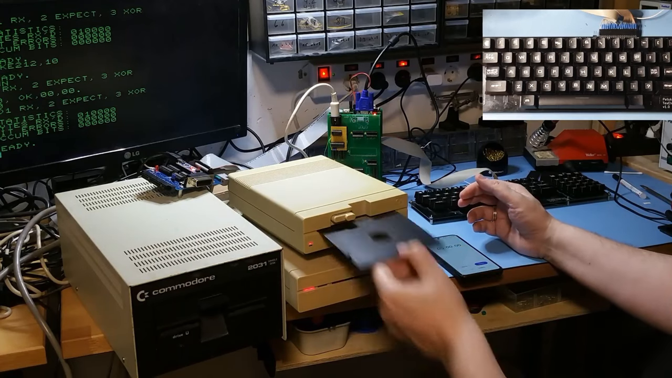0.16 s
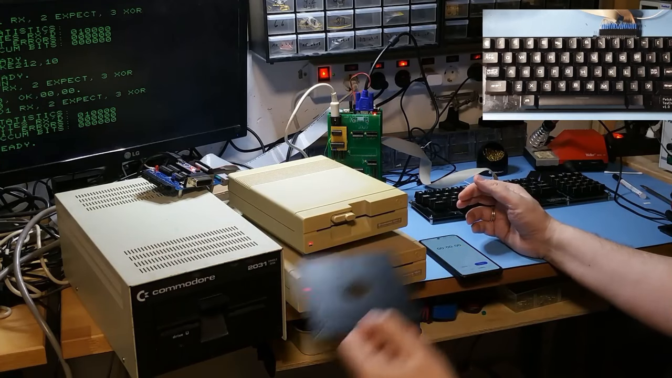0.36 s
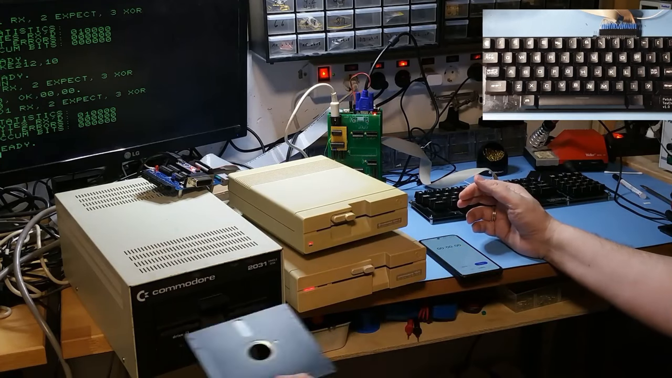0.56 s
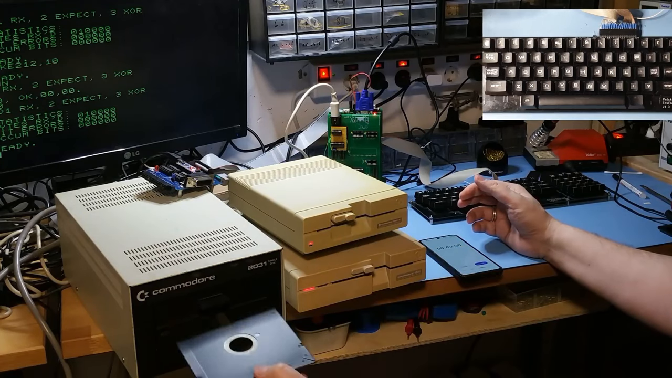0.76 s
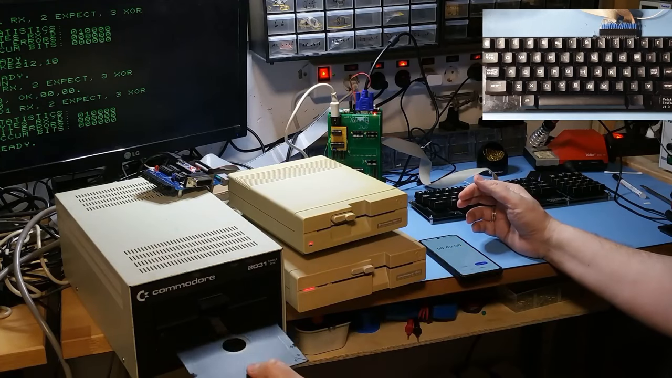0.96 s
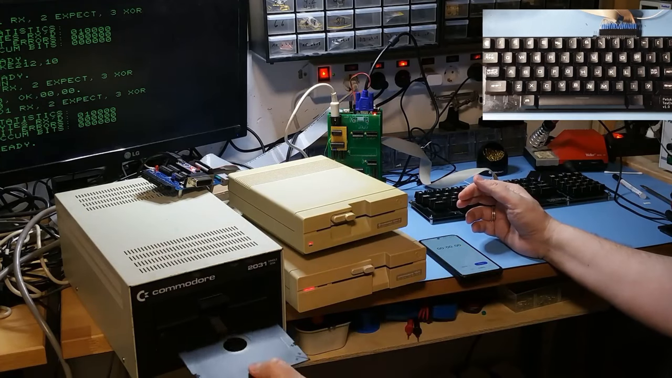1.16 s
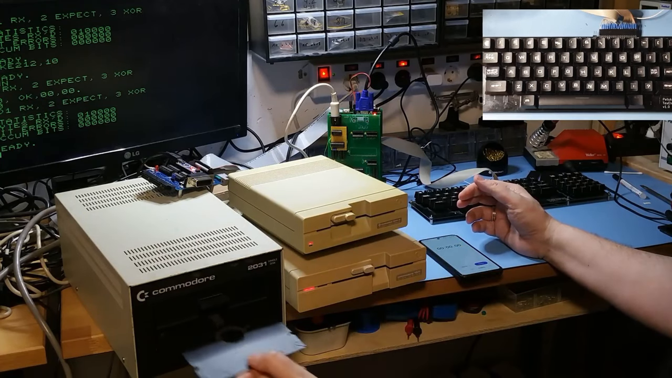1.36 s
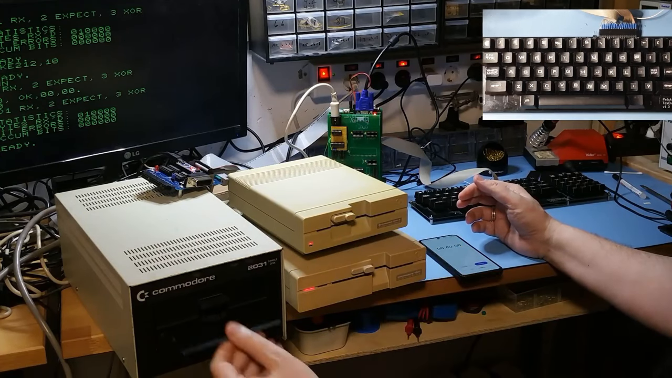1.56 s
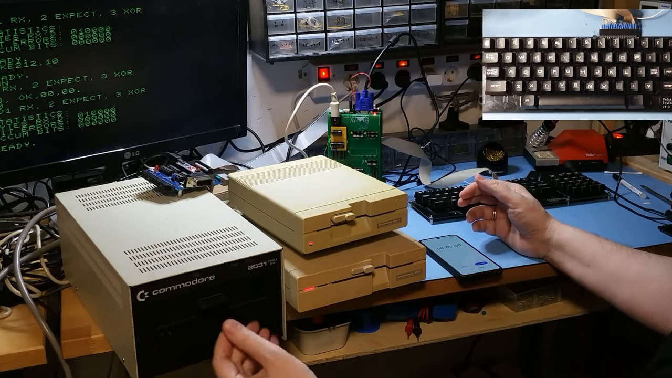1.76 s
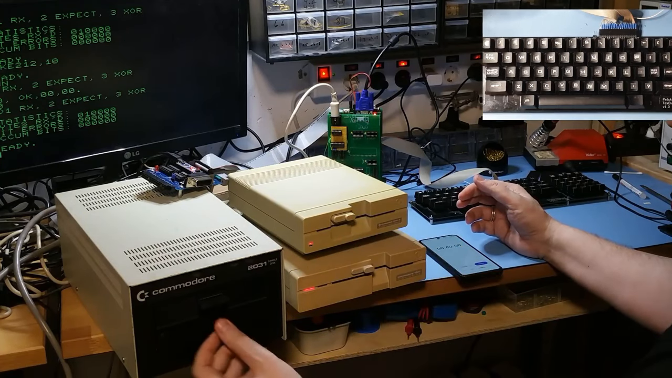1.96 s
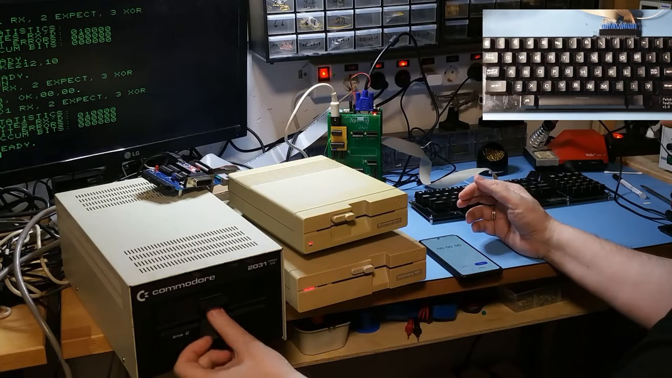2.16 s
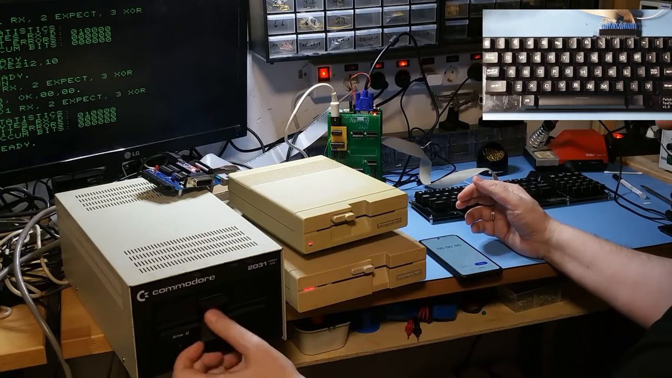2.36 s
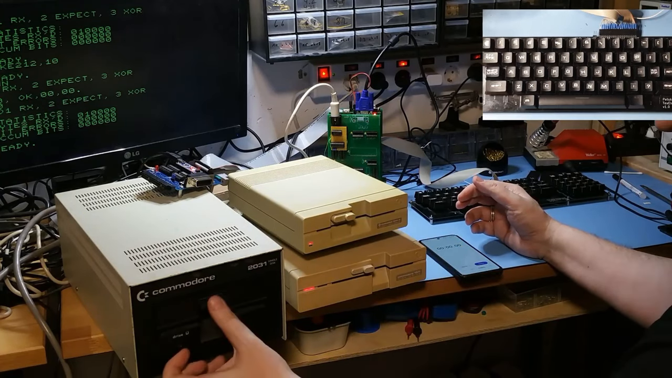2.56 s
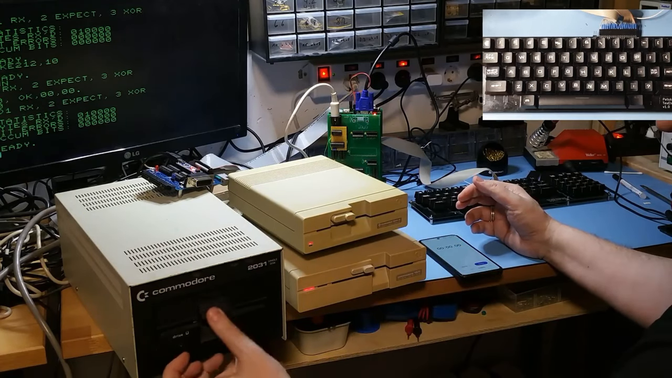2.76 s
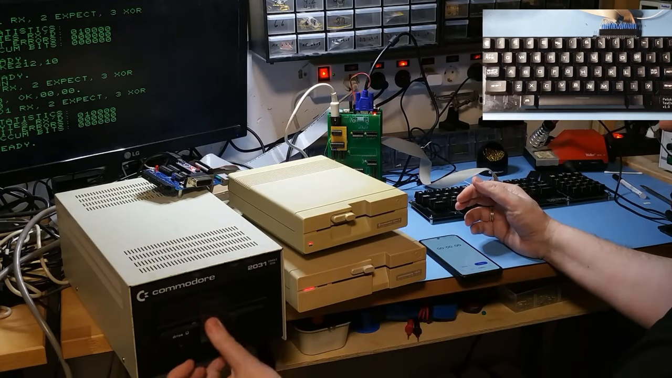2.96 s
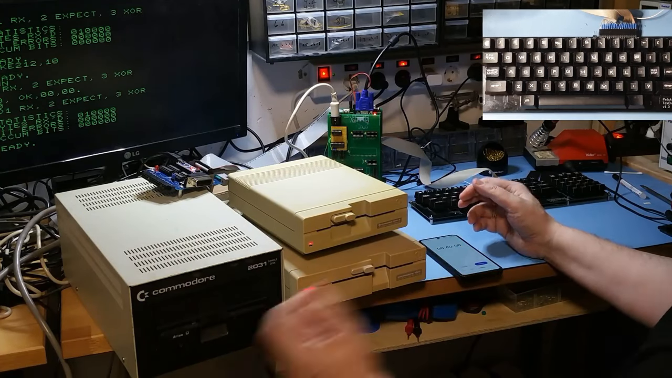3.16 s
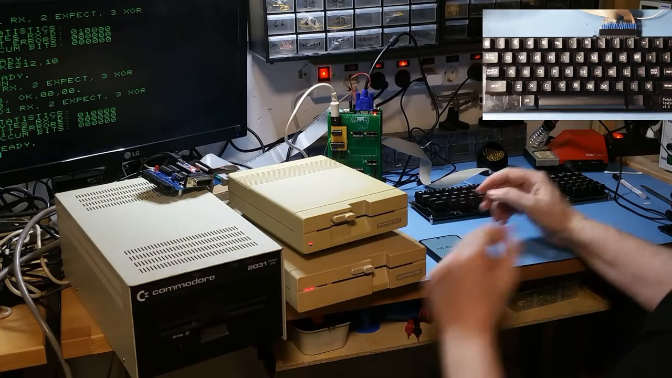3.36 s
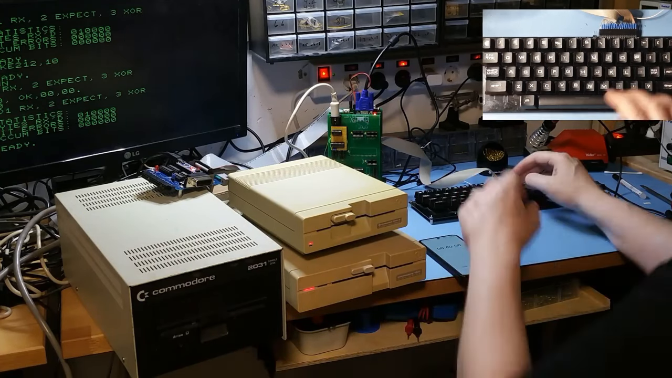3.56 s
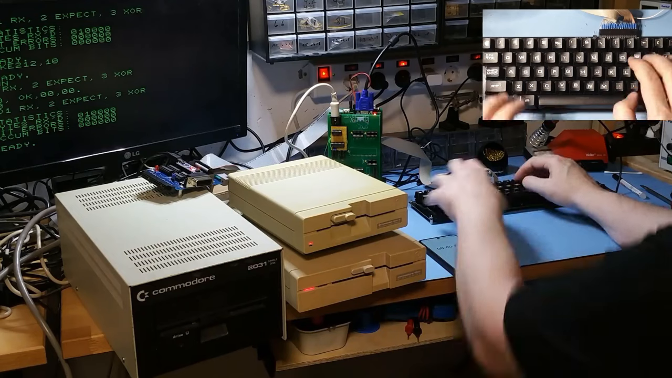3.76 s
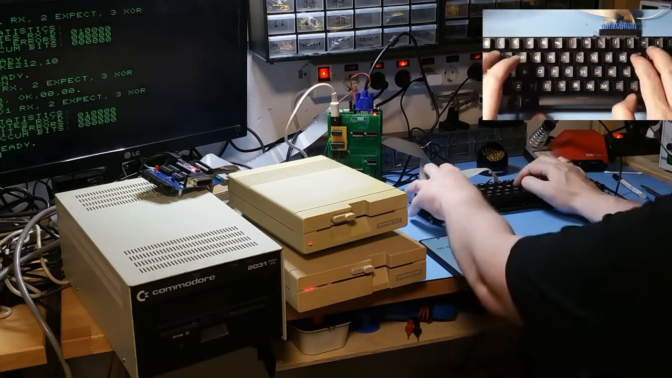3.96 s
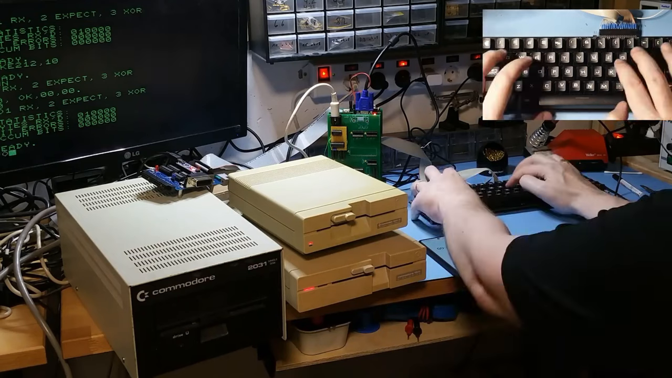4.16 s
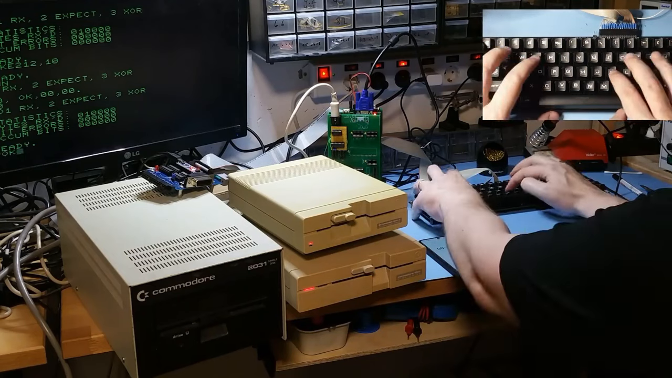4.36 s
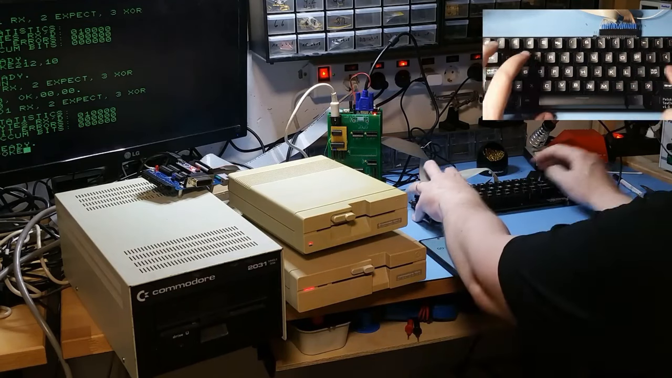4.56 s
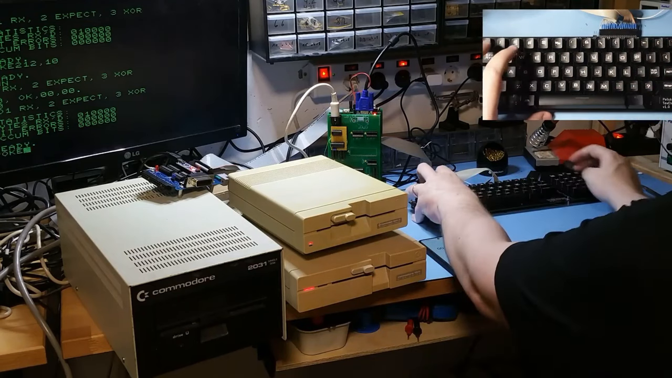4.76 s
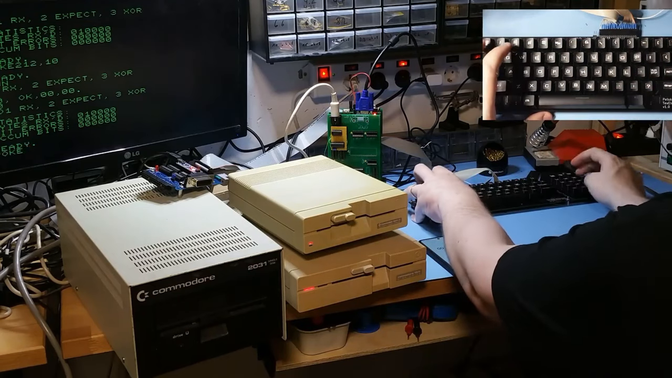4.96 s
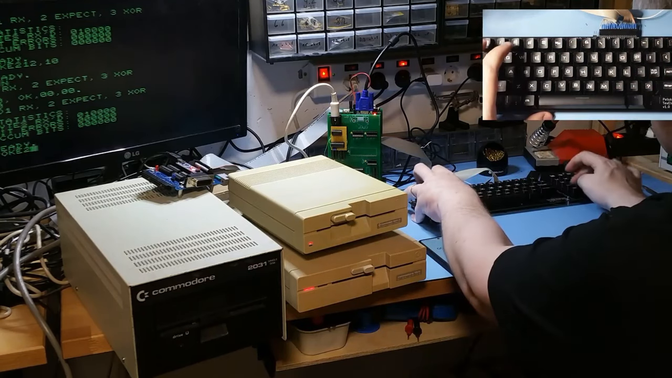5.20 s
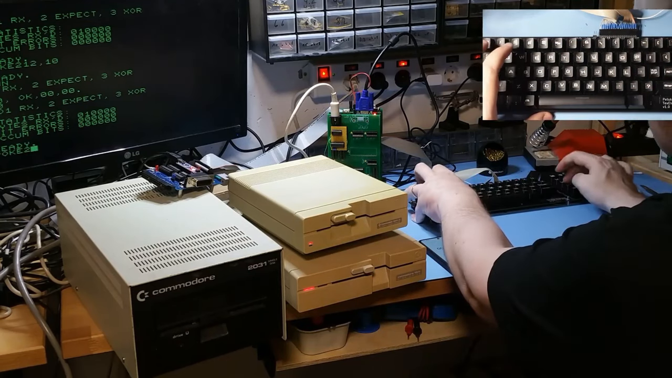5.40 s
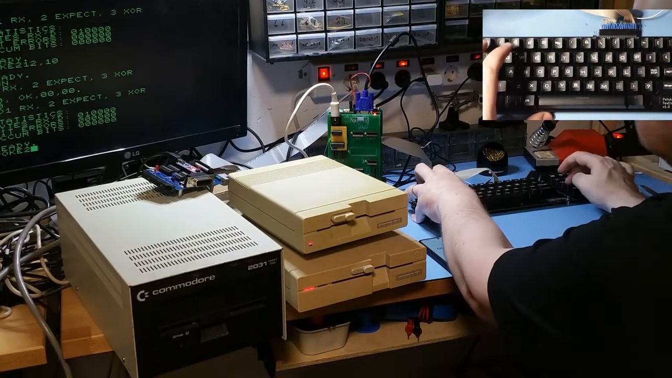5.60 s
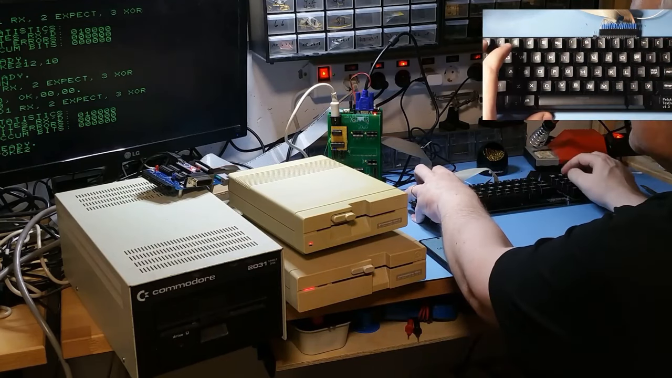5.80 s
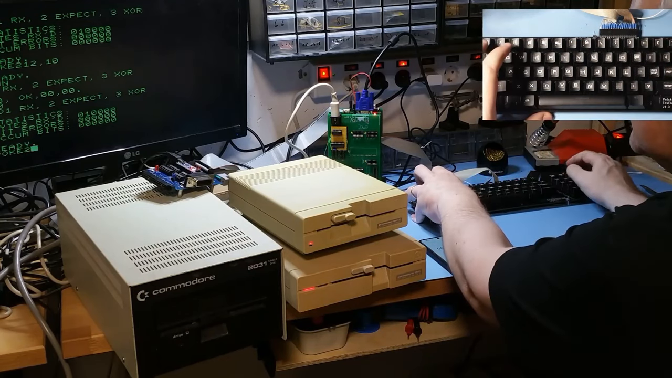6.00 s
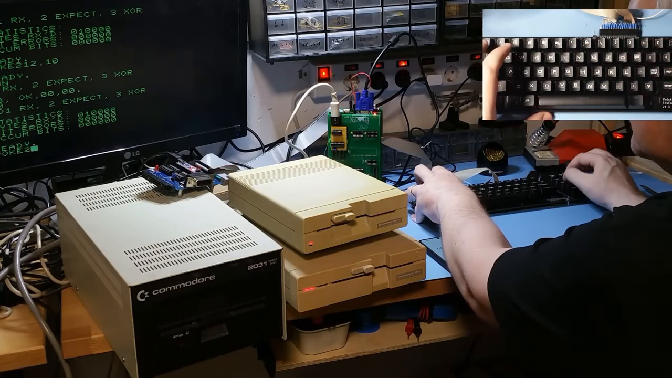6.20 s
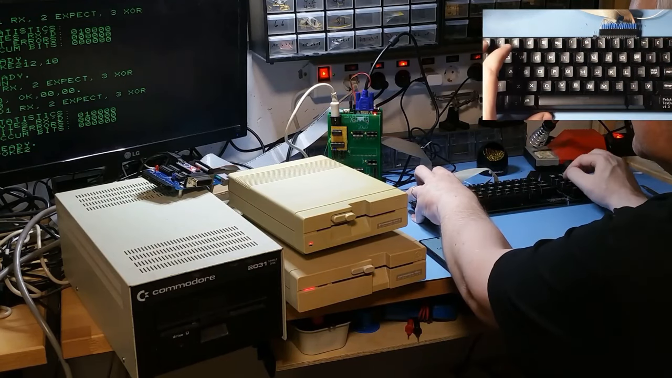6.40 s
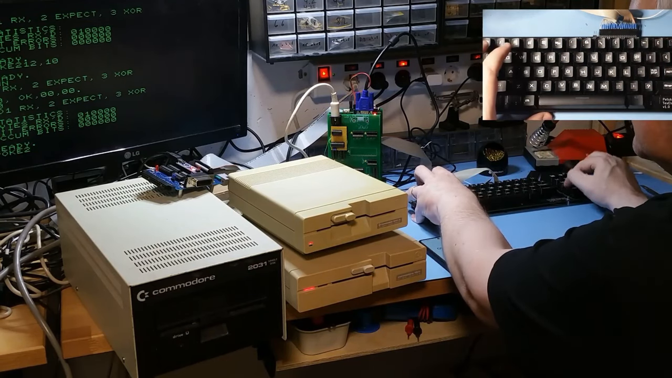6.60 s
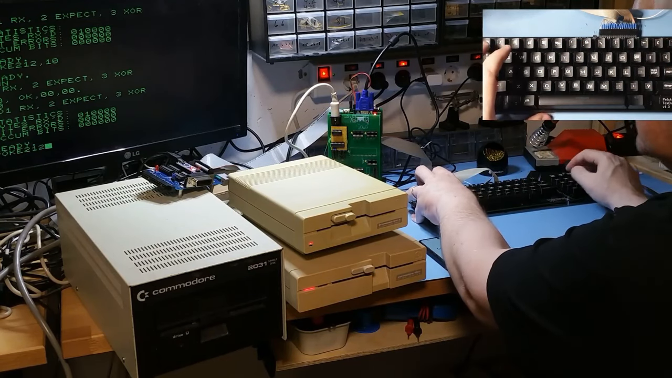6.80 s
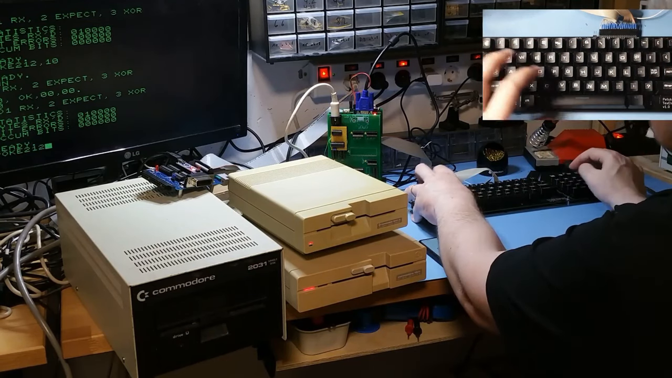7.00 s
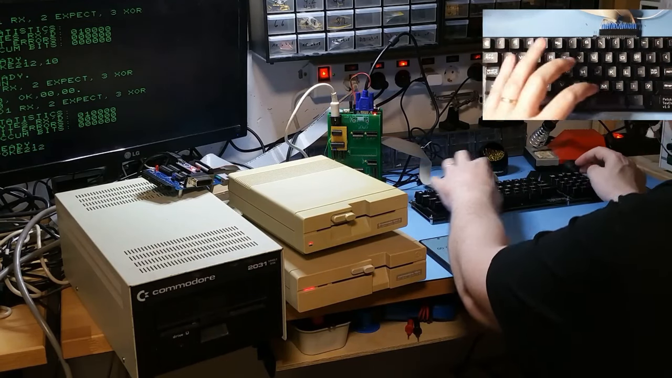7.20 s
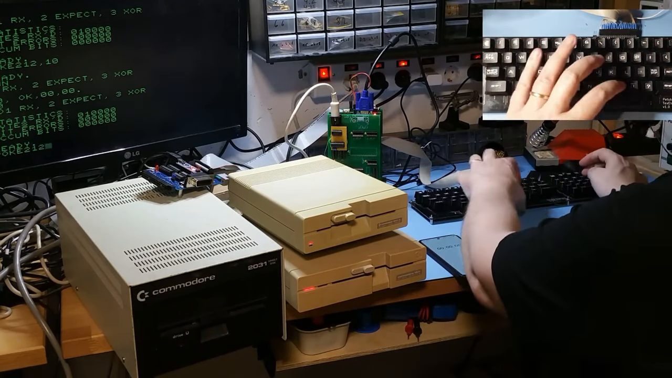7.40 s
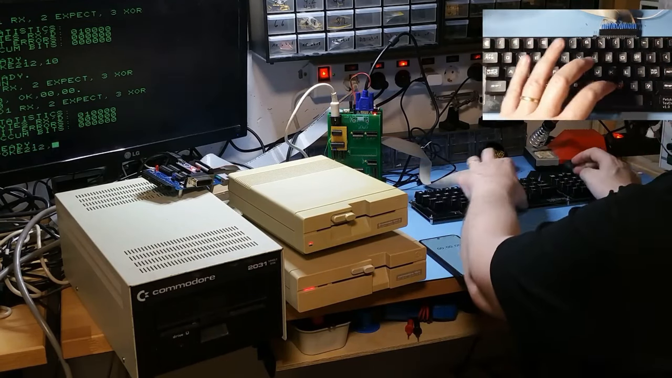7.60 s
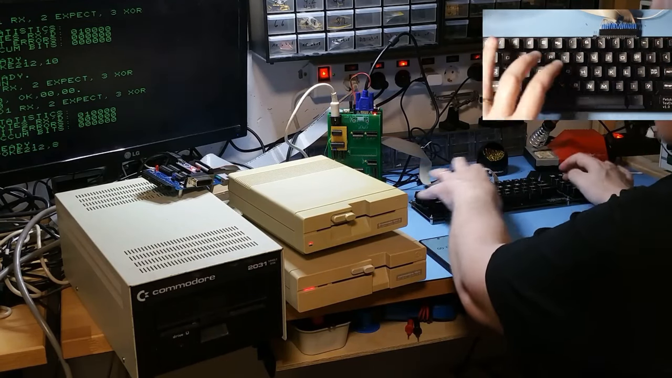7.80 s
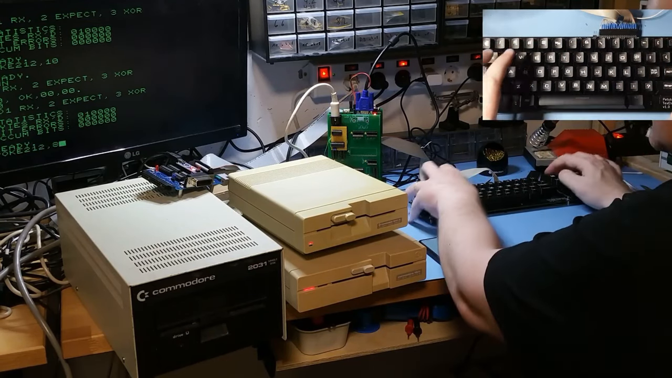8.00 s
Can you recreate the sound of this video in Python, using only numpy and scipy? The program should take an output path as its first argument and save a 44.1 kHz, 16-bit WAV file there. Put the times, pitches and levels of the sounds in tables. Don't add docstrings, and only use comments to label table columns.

```python
import sys
import numpy as np
from scipy import signal
from scipy.fft import rfft, irfft, next_fast_len
from scipy.io import wavfile
from scipy.ndimage import uniform_filter1d, map_coordinates

SR = 44100
rng = np.random.default_rng(int(sys.argv[2]) if len(sys.argv) > 2 else 0)


def invert_db(x):
    u = np.asarray(x, float) / 20
    return 10 ** u


def generate_wav(signal):
    frames = np.transpose(np.atleast_2d(signal))
    scaled = np.clip(frames, -1, 1) * 32767
    pcm = np.round(scaled).astype(np.int16)
    wavfile.write(sys.argv[1], SR, pcm)


N = 354872
LEAD_S = .02


def unit(x):
    return x / np.sqrt(np.mean(x ** 2) + 1e-20)


def peak(x, db):
    return invert_db(db) * x / np.max(np.abs(x))


def along(points, hz):
    f, v = np.transpose(points)
    return np.interp(np.log(hz + 1), np.log(f + 1), v)


def clock(length_s):
    return np.arange(round(length_s * SR)) / SR - LEAD_S


def wobble(rate):
    coarse = np.arange(0, N + 16, 16)
    knots = rng.standard_normal(int(N * rate / SR) + 4)
    return np.interp(np.arange(N), coarse, map_coordinates(knots, [coarse * rate / SR]))


def filtered(x, response):
    m = next_fast_len(len(x) + 4096)
    return irfft(rfft(x, m) * response(np.fft.rfftfreq(m, 1 / SR)), m)[:len(x)]


def through(x, modes, order=1):
    def response(f):
        total = 0
        for k, (hz, width, db) in enumerate(sorted(modes)):
            damping = 1j * f * width
            total = total + (-1) ** k * invert_db(db) * damping / (hz * hz - f * f + damping)
        return total ** order
    return filtered(x, response)


def struck(contact, modes, db):
    return peak(through(contact, modes, order=2), db)


def varied(modes):
    pitch_spread, spread_db = .014, 1.4
    draws = rng.standard_normal((len(modes), 2))
    return [(hz * (1 + pitch_spread * a), width, db + spread_db * b)
            for (hz, width, db), (a, b) in zip(modes, draws)]


def rattle(t, hold, t60, rough_db):
    shape = (t >= 0) * invert_db(-60 * np.maximum(t - hold, 0) / max(t60, 1e-3))
    lumps = np.repeat(rng.standard_normal(len(t) // 32 + 1), 32)[:len(t)]
    z = rfft(shape * invert_db(rough_db * lumps) * rng.standard_normal(len(t)))
    even = z / np.sqrt(uniform_filter1d(np.abs(z) ** 2, size=len(t) * 260 // SR))
    return (t >= 0) * irfft(even, len(t))


def add(track, s, sound, wet_db):
    # f/Hz, t60/s
    room_decay = [(150, 0.57), (500, 0.35), (2500, 0.34), (8000, 0.28), (14000, 0.19)]
    hz, t, z = signal.stft(rng.standard_normal(SR * 2 // 5), SR, nperseg=256)
    decay = invert_db(-60 * t / along(room_decay, hz)[:, None])
    tail = signal.istft(z * decay, SR, nperseg=256)[1]
    tail = np.pad(tail / np.linalg.norm(tail), (round(.026 * SR), 0))
    bins = np.geomspace(1, 8192, 900)
    power = np.interp(bins, np.arange(8193), np.abs(rfft(sound, 16384)) ** 2)
    power = uniform_filter1d(power, size=9)
    wet = invert_db(wet_db) * filtered(tail, lambda f: np.sqrt(np.interp(f * 16384 / SR, bins, power)))
    wet[:round(LEAD_S * SR)] = 0
    wet[:len(sound)] += sound
    start = round((s - LEAD_S) * SR)
    track[start:start + len(wet)] += wet[:N - start]


def tone(hz, db):
    return np.sqrt(2) * invert_db(db) * np.sin(2 * np.pi * np.cumsum(hz + np.zeros(N)) / SR)


def keys(track):
    # t/s, peak level/dB, cap note f/Hz, shell thock level/dB, click level/dB
    presses = [(3.8655, -11.5, 3120, -46, -13), (3.8704, -10.5, 2520, -43, -13),
               (4.0642, -13, 2640, -33, -8.5), (4.0701, -19.5, 2210, -32, -14),
               (4.2403, -18, 2370, -19.5, 0.5), (4.3172, -7, 2800, -48, -12.5),
               (5.0898, -27.5, 3320, -15.5, 10), (5.0964, -23.5, 3160, -19, 1),
               (5.105, -26.5, 3300, -26, 2.5), (6.1712, -24, 1890, -20, -14),
               (6.3797, -21.5, 1950, -17, -17), (6.3903, -23.5, 3640, -20, 1),
               (6.4014, -22.5, 2100, -11, -4), (6.574, -21.5, 3310, -20.5, 0.5),
               (7.361, -12.5, 2440, -15.5, -4.5), (7.7035, -26, 3250, -47, 7.5),
               (7.9906, -6, 2890, -19.5, -15), (7.9982, -17, 2530, -33, -9.5)]
    # t/s, peak level/dB, stem click level/dB
    releases = [(3.9746, -24, -7), (4.139, -24, -2), (4.4041, -24.5, -2), (5.1676, -20.5, -7),
                (6.248, -26.5, -12), (6.474, -26, -4.5), (6.6405, -24, -9), (7.4391, -23, -6),
                (7.7608, -29.5, -4)]
    # f/Hz, width/Hz, level/dB
    shell = [(2110, 510, 5), (3680, 900, 5), (5820, 2530, -0.5)]
    # f/Hz, width/Hz, level/dB
    base_plate = [(1498, 260, 4.5), (1770, 270, -4.5)]
    # f/Hz, width/Hz, level/dB
    stem = [(7420, 1550, 3), (8214, 370, 11.5), (9140, 1480, 3)]
    # f/Hz, width/Hz, level/dB
    cap_edge = [(11300, 770, 1.5), (12920, 690, 12.5), (13250, 1500, 3.5)]
    # f/Hz, width/Hz, level/dB
    guide = [(3250, 1160, 1), (5930, 4500, -5), (8760, 2540, -6.5), (13400, 830, -31.5)]
    bare_tick = [(6000, 2800, -4), (10500, 3400, 0), (15000, 3000, -4)]
    stop_hz, stop_thock_db = 3170, -19
    touch_fizz_db, land_fizz_db = -7.5, -13.5
    speed_up_db_per_s = 600
    t = clock(.1)

    returns = [(s, db, stop_hz, stop_thock_db, click_db) for s, db, click_db in releases]
    contacts = sorted([*map(tuple, presses), *returns])
    touches = np.diff([c[0] for c in contacts], append=99) < .015
    for (s, db, hz, thock_db, click_db), touch in zip(contacts, touches):
        travel = rattle(t + 0.011, 0.0087, 0.064, 3.32)
        travel = travel * invert_db(speed_up_db_per_s * np.minimum(t, 0))
        slide = struck(travel, guide, db + click_db - 8.5)
        slide += struck(rattle(t, 0.003, 0.02, 3), bare_tick, db + click_db - 12.5)
        land = rattle(t, 0.011, 0.014, 3.4)
        clack = struck(land, varied(shell), db - 7.5)
        clack += struck(land, [(hz, 500, 0)], db - 7)
        thock = struck(land, base_plate, db + thock_db)
        click = struck(rattle(t + 0.0016, 0.0018, 0.041, 2.05), varied(stem), db + click_db)
        fizz_db = click_db + (touch_fizz_db if touch else land_fizz_db)
        fizz = struck(rattle(t + 0.0044, 0.0081, 0.022, 1), varied(cap_edge), db + fizz_db)
        add(track, s, slide + clack + thock + click + fizz, wet_db=-4.5)


def knocks(track):
    # t/s, peak level/dB, note f/Hz, hollow case level/dB, panel level/dB
    blows = [(0.0295, -11.5, 2350, -38, -12), (0.0784, -20.5, 4220, -25, -9.5),
             (0.2783, -44.5, 4520, 7, -8), (0.8487, -39, 2180, -9, -22), (0.87, -40, 2100, -6, -6.5),
             (1.139, -17.5, 2120, -5.5, -4.5), (1.1535, -27, 1190, 2, -1), (1.2588, -33, 3030, -6, -20),
             (1.3371, -29, 2930, -8.5, -22), (1.3772, -26, 2110, -38, -6), (1.393, -26, 11800, -30, -12),
             (1.5507, -43, 1500, 8.5, 2), (1.7652, -39.5, 1600, -7, -14), (1.8725, -36, 2560, -8, -17),
             (1.9135, -29, 1480, -4.5, 1), (1.9703, -41, 1590, -7, -12), (2.036, -24, 14340, -27, -30),
             (2.0481, -15, 2300, -4.5, -4), (2.054, -26.5, 4050, -15, -6), (2.2002, -37.5, 1580, -3, -12),
             (2.4999, -32, 1720, -4, -8.5), (2.656, -28.5, 1590, 1, -14), (2.7046, -29, 3920, -1, -2.5),
             (2.7637, -29.5, 1610, -0.5, -1.5)]
    # f/Hz, width/Hz, level/dB
    plastic = [(1700, 486, -0.95), (2580, 990, 0.052), (4270, 2100, -1.6)]
    hollow = [(260.6, 63, -2.3), (413, 89, 0.1), (526, 116, -2.0)]
    panel = [(657, 140, -3.5), (980, 736, 1.3), (1224, 890, -0.27)]
    rim = [(5933, 3300, 0.96), (9720, 8400, 0.83), (14030, 1500, -2)]
    note_width = .26
    rim_db, rim_trade = -12.5, 0.34
    t = clock(.2)
    for s, db, hz, case_db, panel_db in blows:
        blow = rattle(t, 0.003, 0.035, 3.7)
        sound = struck(blow, plastic, db - 4.5)
        sound += struck(blow, [(hz, note_width * hz, 0)], db - 6.5)
        sound += struck(blow, hollow, db + case_db)
        sound += struck(blow, panel, db + panel_db)
        sound += struck(blow, rim, db + rim_db - rim_trade * case_db)
        add(track, s, sound, wet_db=-5.0)


def latch(track):
    # t/s, peak level/dB, contact t60/s
    snaps = [
        (2.812, 3.5, 0.033),
    ]
    # f/Hz, width/Hz, level/dB
    front = [(287, 63, 4), (391, 114, 6), (460, 53, 12), (704, 99, -1), (922, 160, -2), (1600, 170, 0.5),
             (2300, 450, -1), (2800, 530, -7.5), (3497, 500, 3.5), (3760, 760, 1), (4496, 540, -3.5),
             (6320, 450, -4.5), (8140, 1700, -7), (12500, 8600, -15)]
    # f/Hz, level/dB, t60/s
    housing = [(535, -23, 0.24), (660, 7.5, 0.31), (889, 17.5, 0.57), (1480, -8.5, 0.1), (1720, -71, 0.47),
               (2260, -51, 0.021), (2580, -5, 0.084), (3090, -25, 0.23), (3550, -32.5, 0.27),
               (3770, 25, 0.17), (4145, -55, 5.0), (4620, -13, 0.21)]
    t = clock(.2)
    for s, db, t60 in snaps:
        snap = peak(through(rattle(t, 0.002, t60, 1.8), front), db)
        thud = struck((t > 0) * np.exp(-t / 0.00035), front[:3], db - 9)
        ring = 0
        for hz, level_db, decay_s in housing:
            ring = ring + invert_db(level_db - 60 * t / min(decay_s, .12)) * np.sin(2 * np.pi * hz * t)
        add(track, s, snap + thud + peak(ring * (t > 0), db - 18), wet_db=-8.5)


def lever(track):
    # t/s, peak level/dB
    ticks = [(0.2776, -44), (2.5001, -40), (2.6568, -33), (2.7049, -33), (4.6094, -46)]
    # f/Hz, width/Hz, level/dB
    steel = [(3800, 260, 0.5), (4500, 300, 2), (6550, 300, 2.5), (8800, 700, -1.5)]
    t = clock(.1)
    for s, db in ticks:
        add(track, s, struck(rattle(t, .004, .05, 2.5), steel, db), wet_db=-8.5)


def rubbing():
    # fastest at t/s, rise/s, fall/s, level/dB, bright share level/dB
    strokes = [(0.012, 0.057, 0.047, -44, 2.5), (0.032, .001, 0.031, -31.5, -2),
               (0.085, 0.0066, .07, -38.5, -5), (0.2, .1, 0.25, -61, -2), (1.31, 0.1, 0.18, -48, -2.5),
               (1.399, 0.054, 0.069, -36.5, -9), (1.445, 0.023, 0.065, -42.5, -12.5),
               (1.52, 0.069, 0.093, -43, -5), (1.79, 0.074, 0.1, -51.5, -6),
               (1.914, 0.09, .07, -41.5, -8.5), (2.0, .1, 0.11, -44, -6), (2.04, .004, 0.027, -36.5, -2),
               (3.15, .2, 0.17, -71.5, 2.5), (3.53, 0.25, 0.33, -65.5, 2.5)]
    # f/Hz, width/Hz, level/dB
    sleeve_modes = [(950, 620, -6), (1600, 280, 2.0), (2330, 1400, -3.5), (2920, 640, -0.5), (4350, 1130, -7.0)]
    case_modes = [(316.0, 220, 0), (496, 154, 1), (687.0, 190, -3.0)]
    edge_modes = [(5250, 1500, 3.0), (7100, 1940, 4.0), (8500, 1500, 4.5), (11500, 5100, -4.5)]
    fade_db = 19.5
    case_share_db, case_trade = -12.5, 1.1

    def grit():
        rough_db = 2.2 * wobble(400) + 1.7 * wobble(70) + 0.94 * wobble(22)
        return invert_db(rough_db) * rng.standard_normal(N)

    sleeve = unit(through(grit(), sleeve_modes))
    case = unit(through(grit(), case_modes, order=2))
    edge = unit(through(grit(), edge_modes, order=2))
    out = np.zeros(N)
    for s, rise, fall, db, edge_db in strokes:
        span = slice(max(round((s - 2 * rise) * SR), 0), round((s + 2 * fall) * SR))
        t = np.arange(N)[span] / SR - s
        speed = invert_db(db - fade_db * np.maximum(-t / rise, t / fall) ** 1.6)
        case_db = case_share_db - case_trade * edge_db
        out[span] += speed * (sleeve + invert_db(case_db) * case + invert_db(edge_db) * edge)[span]
    return out


def palm(track):
    # t/s, peak level/dB, t60/s
    slaps = [
        (3.674, -13.5, 0.033),
    ]
    # f/Hz, width/Hz, level/dB
    board = [(310, 135, -0.5), (476, 450, -1.5), (827, 230, 0), (1190, 360, -1), (1910, 630, -0.5),
             (2390, 1340, -8)]
    t = clock(.2)
    for s, db, t60 in slaps:
        add(track, s, struck(rattle(t, 0.0044, t60, rough_db=-0.5), board, db), wet_db=-1.5)


def thuds(track):
    # t/s, peak level/dB, drawer note level/dB
    pushes = [(0.286, -31.5, -3), (0.975, -42, -12), (2.181, -26, -30), (2.812, -27, 8), (3.331, -34, -12),
              (3.684, -29.5, -0.5), (3.871, -50, -22), (4.252, -33, -18), (4.34, -40, -22),
              (4.613, -31.5, -9.5), (4.738, -43, -22), (4.977, -43.5, -9), (5.707, -34, -6.5),
              (6.38, -37, -29), (7.123, -39, 2.5), (7.383, -29, -31), (7.991, -31.5, -21.5)]
    # f/Hz, width/Hz, level/dB
    desk = [(74, 45, 23.5), (129, 13, -2.5)]
    # f/Hz, width/Hz, level/dB
    drawer = [(238.8, 88, -2), (320, 21, 0)]
    t60 = .17
    t = clock(.25)
    for s, db, note_db in pushes:
        push = (t > 0) * invert_db(-60 * t / t60) * rng.standard_normal(len(t))
        add(track, s, struck(push, desk, db) + struck(push, drawer, db + note_db), wet_db=-15.0)


def chair():
    start_s, length_s = 5.07, 0.2
    top_hz, sag_hz, level_db = 231, 18, -54
    u = np.clip((np.arange(N) / SR - start_s) / length_s, 0, 1)
    arch = np.sqrt(np.abs(np.sin(np.pi * u)))
    return arch * tone(top_hz - sag_hz * (1 - arch), level_db + 3 * wobble(30))


def machines():
    # t/s, level/dB
    drone_levels = [(0, -36.5), (1.6, -37), (2.2, -36), (3.4, -37.5), (3.6, -41), (4.4, -43), (5.0, -40),
                    (5.7, -38), (8.05, -37)]
    # f/Hz, rms level/dB
    buzz_tones = [(199.2, -65.5), (301.5, -67.5), (398.4, -59), (500.6, -97), (915.2, -68.5), (1082, -67),
                  (1147, -77)]
    # f/Hz, level/dB per Hz
    air_colour = [(130, -7.5), (200, -10.5), (240, -12), (400, -7.5), (600, -12), (1100, -12), (1400, -18),
                  (2100, -15), (3000, -22.5), (4500, -28), (7000, -33.5), (11000, -35), (14500, -36.5),
                  (16500, -42.5)]
    # t/s, spread/s, level/dB
    shifts = [(.1, 0.31, -66), (1.45, 0.19, -50.5), (2.2, 0.21, -52), (2.9, 0.19, -50), (3.9, 0.28, -45.5),
              (5.15, 0.11, -49.5), (7.45, 0.19, -58)]
    # f/Hz, level/dB per Hz
    deep_colour = [(15, -28), (35, -2), (60, -0.5), (85, 0.5), (105, -8.5), (135, -7), (155, -20), (200, -41.5)]
    drone_hz, air_db, rumble_db = 56.3, -53, -53
    t = np.arange(N) / SR
    drone_s, drone_db = np.transpose(drone_levels)
    drone = tone(drone_hz + .3 * wobble(2.4), np.interp(t, drone_s, drone_db) + .6 * wobble(6.5))
    buzz = sum(tone(hz * (1 + .002 * wobble(4.4)), db + 2 * wobble(12)) for hz, db in buzz_tones)
    air = filtered(rng.standard_normal(N), lambda f: invert_db(along(air_colour, f)) * (f > 130))
    deep = filtered(rng.standard_normal(N), lambda f: invert_db(along(deep_colour, f)))
    weight = invert_db(rumble_db) + sum(invert_db(db) * np.exp(-((t - s) / spread) ** 2) for s, spread, db in shifts)
    rumble = weight * invert_db(3.3 * wobble(6.2)) * unit(deep)
    return drone + buzz + invert_db(air_db) * unit(air) + rumble


def difference(hits):
    # f/Hz, level/dB per Hz
    noise_colour = [(100, -21.5), (400, 2.5), (800, -1.5), (1500, -28.5), (3000, 2), (5000, 1.5), (8000, 3),
                    (8600, -13), (16000, -34.5)]
    noise = filtered(rng.standard_normal(N), lambda f: invert_db(along(noise_colour, f)))
    treble = filtered(np.roll(hits, 9), lambda f: f > 9000)
    return invert_db(-78.5) * unit(noise) + invert_db(-24 + 6 * wobble(25)) * treble


def scene():
    hits = rubbing()
    for source in (keys, knocks, lever, latch, palm, thuds):
        source(hits)
    mid = hits + machines() + chair()
    side = difference(hits)
    return np.array([mid + side, mid - side])


def band_limit(x):
    return signal.sosfilt(signal.butter(12, 16420, fs=SR, output="sos"), x)


def record(dry):
    limited = dry / (1 + np.abs(dry / .98) ** 6) ** (1 / 6)
    mix = np.array([filtered(channel, lambda f: np.clip((16450 - f) / 700, 0, 1)) for channel in limited])
    return band_limit(mix)


dry = scene()
out = record(dry)
generate_wav(out)
```